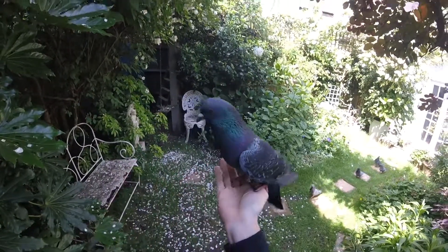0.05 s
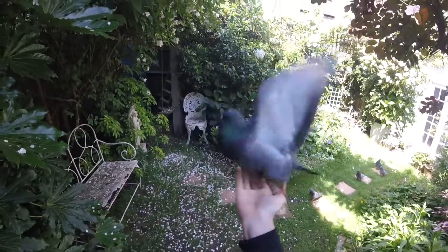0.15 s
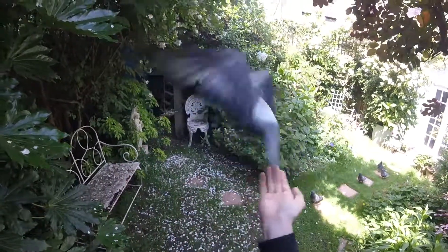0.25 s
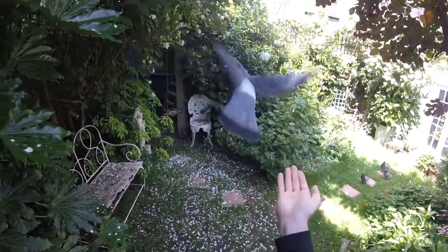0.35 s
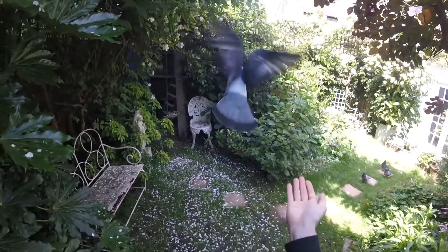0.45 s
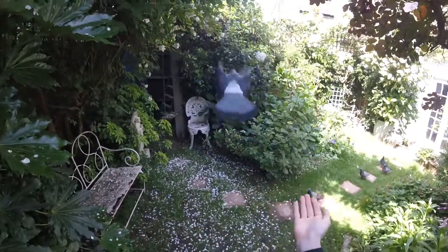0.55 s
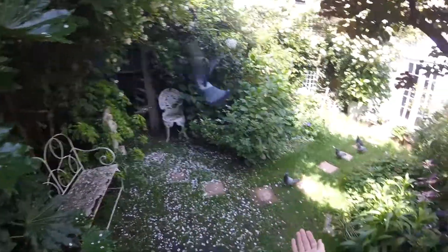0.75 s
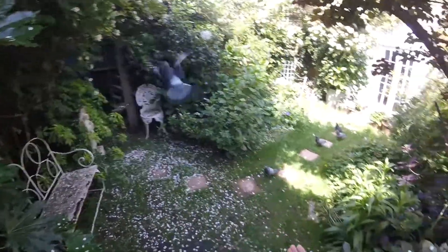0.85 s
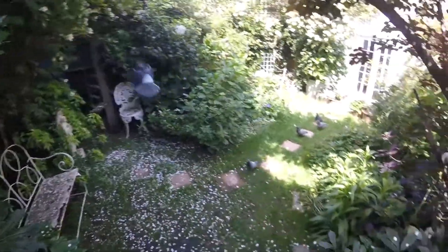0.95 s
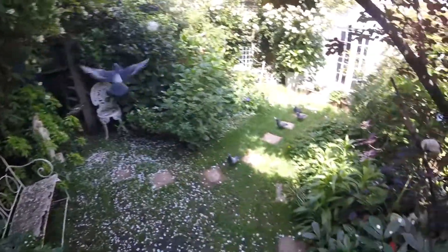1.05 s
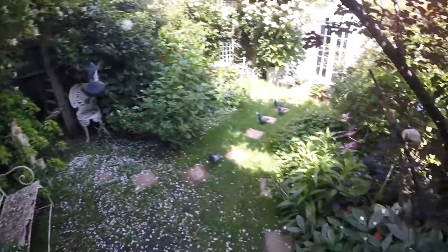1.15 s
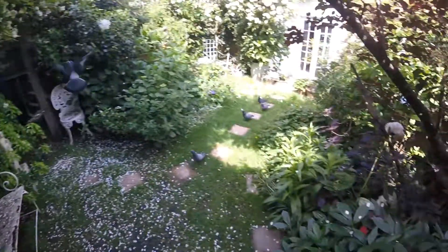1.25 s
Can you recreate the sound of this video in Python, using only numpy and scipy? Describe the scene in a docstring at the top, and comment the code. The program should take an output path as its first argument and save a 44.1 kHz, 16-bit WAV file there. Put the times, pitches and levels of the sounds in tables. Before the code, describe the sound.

Pigeon wings clatter softly into flight, swishing and whistling away across a quiet garden.

```python
"""Pigeon taking off from a hand.

The bird launches close to the microphone and flies off across a quiet garden. Each wingbeat
swishes and sets the flight feathers fluttering in a brief whistle; the nearest also push a slow
pressure wave. The wake buffets the microphone, whose gain ticks down in steps and creeps back."""
import sys
import numpy as np
from scipy import signal
from scipy.fft import rfft, irfft
from scipy.io import wavfile
from scipy.ndimage import uniform_filter1d

SR = 44100
rng = np.random.default_rng(int(sys.argv[2]) if len(sys.argv) > 2 else 0)


def waveform_to_disk(signal):
    """Save audio, clipped to [-1, 1], as 16-bit WAV at the path in sys.argv[1]."""
    frames = np.transpose(np.atleast_2d(signal))
    scaled = np.clip(frames, -1, 1) * 32767
    samples = np.round(scaled).astype(np.int16)
    wavfile.write(sys.argv[1], SR, samples)


N = 57330

# garden air: freq_hz, density_db
AIR_SPECTRUM = [(15, -3.5), (40, 4), (90, -7), (170, -10.5), (300, -12.5), (500, -22), (850, -26.5),
                (1400, -29.5), (3000, -36), (5700, -37), (6550, -28), (7200, -36.5), (9000, -39.5),
                (11000, -48.5), (13500, -48)]
# plumage on the hand: freq_hz, density_db
RUSTLE_SPECTRUM = [(150, -14), (500, -1.5), (1500, -2.5), (3000, -6.5), (6000, -19.5), (12000, -33)]
# hollow tones of the first stroke: centre_hz, width_oct, level_db
LAUNCH_TONES = [(818, 0.071, -42.5), (1930, .1, -48)]
# feather scuffs, thin squeaks and small sharp ticks: centre_s, half_s, level_db, centre_hz, width_oct
SCUFFS_AND_TICKS = [(0.1885, 0.0033, -50.5, 6200, 0.068), (0.201, 0.026, -57, 5030, 0.49),
                    (0.254, 0.0065, -51, 3740, 1.1), (0.285, 0.011, -57.5, 3800, .8),
                    (0.314, 0.0009, -45, 2800, .3), (0.3265, 0.0013, -47.5, 3800, .3),
                    (0.383, 0.03, -57, 2460, 0.77), (.445, 0.017, -60.5, 2480, 0.74),
                    (0.86, 0.01, -56, 6370, 0.021), (1.262, 0.006, -56, 6100, .025)]
# wingbeats: centre_s, half_s, swish_db, swish_tilt_db_oct, pitch_hz, whistle_db, whistle_tilt_db_oct
WINGBEATS = [(0.225, 0.013, -46, 2.5, 797.5, -58, 4), (0.418, 0.011, -48, -2, 721, -47.5, -2),
             (.578, 0.022, -58, 1, 668, -54.5, 4), (.715, .020, -54.5, 2, 756, -53.5, 3),
             (0.861, 0.018, -55.5, -0.5, 715, -57, 7.5), (0.993, 0.018, -51, 0.5, 924, -54, -29),
             (1.122, 0.019, -56, 2.5, 830, -57.5, -1.5), (1.258, .016, -55, 0, 868, -53.5, -5)]
# air through feathers: freq_hz, density_db
SWISH_SPECTRUM = [(200, -35.5), (500, 15), (900, 4.5), (2000, 4), (3800, 0), (5200, -1), (6500, -1),
                  (7500, -7), (11000, -23), (12300, -48)]
# feather flutter: harmonic, level_db
FLUTTER_HARMONICS = [(1, 11), (2, 6), (3, 0.5), (4, 0), (5, -7.5), (6, -9.5), (7, -7), (8, -9), (9, -11)]
# pressure waves of the nearest strokes: centre_s, half_s, suction_db
PRESSURE_WAVES = [(0.2375, 0.0078, -10.5), (0.401, .006, -17), (0.521, 0.0061, -27), (0.664, 0.0066, -32)]
# wake eddies: hit_s, turbulence_db, decay_s, tilt_db_oct, kick_db, ring_db
EDDIES = [(0.2738, -16.5, 0.0056, -4, -14.5, -46), (.305, -10, 0.012, 1.5, -1, -15.5),
          (.323, -6, .009, -2, -4, -25), (.341, -8.5, 0.0074, -1, -3, -27),
          (.363, -26, 0.015, -3, -23, -57), (.380, -23.5, 0.021, -1, -16.5, -44),
          (0.443, -37, 0.065, -13, -28.5, -76)]
# eddy turbulence: freq_hz, density_db
EDDY_SPECTRUM = [(15, -6.5), (35, 0), (65, -6), (105, -1.5), (190, -11), (310, -14.5), (410, -25),
                 (520, -19), (720, -23.5), (950, -38.5), (1400, -50), (3000, -64), (8000, -90)]
# microphone housing modes: freq_hz, level_db, decay_s
HOUSING_MODES = [(529, 0, 0.0063), (680.7, 0, 0.0075), (798, -7.5, .007), (1127, -14.5, 0.0045)]


def undb(db):
    """Decibels to gain."""
    return 10 ** (np.asarray(db) / 20)


def unit_rms(x):
    """Scale to rms 1."""
    return x / np.sqrt(np.mean(x ** 2) + 1e-20)


def since(at_s):
    """Seconds since at_s."""
    return np.arange(N) / SR - at_s


def bell(at_s, half_s):
    """Gaussian envelope, peak 1."""
    return np.exp(-.5 * (since(at_s) / half_s) ** 2)


def octaves(hz):
    """Octaves from hz to each spectral bin."""
    return np.log2(np.maximum(np.arange(N // 2 + 1) * SR / N, 1) / hz)


def noise(bin_db):
    """Noise of rms 1, shaped per bin."""
    return unit_rms(irfft(rfft(rng.standard_normal(N)) * undb(bin_db), N))


def colour(spectrum):
    """Interpolate a spectrum table to dB per bin."""
    hz, db = np.array(spectrum, float).T
    return np.interp(octaves(1), np.log2(hz), db)


def band(hz, width_oct):
    """Noise in one steep-skirted resonance."""
    return noise(-30 * np.log10(1 + (octaves(hz) / width_oct) ** 2 / 2))


def wander(rate_hz):
    """Smooth random signal of rms 1."""
    return noise(-40 * np.log10(1 + 4 ** octaves(rate_hz)))


def garden():
    """Steady outdoor rumble and thin hiss."""
    return undb(-45.5) * noise(colour(AIR_SPECTRUM))


def take_off(rustle_end_s=.284, fade_s=.039):
    """Plumage rustles on the hand; the first, hardest stroke rings hollow."""
    fade = np.clip(-since(rustle_end_s) / fade_s, 0, 1)
    rustle = undb(-58.5) * noise(colour(RUSTLE_SPECTRUM)) * fade
    hollow = sum(undb(db) * band(hz, width_oct) for hz, width_oct, db in LAUNCH_TONES)
    return rustle + bell(at_s=.2303, half_s=.0067) * hollow


def garden_echo(x, delay_s=.024, t60_s=1, cutoff_hz=3840):
    """Bushes and walls scatter back a faint, dull tail."""
    t = since(delay_s)
    dull = noise(-10 * np.log10(1 + 4 ** octaves(cutoff_hz)))
    tail = dull * (t > 0) * undb(-60 * np.abs(t) / t60_s)
    return undb(-13) * signal.fftconvolve(x, tail / np.sqrt(np.sum(tail ** 2)))[:N]


def scuffs_and_ticks():
    """Feather scuffs, thin squeaks and small sharp ticks: brief bands of noise."""
    return sum(undb(db) * bell(at_s, half_s) * band(hz, width_oct)
               for at_s, half_s, db, hz, width_oct in SCUFFS_AND_TICKS)


def airspeed(at_s, half_s):
    """Bell-like airflow over the feathers in one stroke, peak 1."""
    return np.exp(-.5 * np.abs(since(at_s) / half_s) ** 1.83)


def wing_swishes(grain_db=1.07):
    """Air rushes through the feathers at each stroke, slightly grainy."""
    out = 0
    for at_s, half_s, db, tilt_db_oct, *_ in WINGBEATS:
        envelope = undb(db + grain_db * wander(330)) * airspeed(at_s, half_s)
        out += envelope * noise(colour(SWISH_SPECTRUM) + tilt_db_oct * octaves(3000))
    return out


def feather_flutter(at_s, half_s, hz, tilt_db_oct, rise_per_s=2.7, bend_s=.115, flicker_db=1.8):
    """One wing's feathers flutter: a harmonic tone that climbs with the stroke and levels off."""
    t = np.clip(since(at_s), -2 * half_s, 2 * half_s)
    jitter = .006 * wander(400)
    pitch_hz = hz * np.exp(rise_per_s * t - (t / bend_s) ** 2 + jitter)
    phase = 2 * np.pi * (np.cumsum(pitch_hz) / SR + rng.random())
    tone = sum(undb(db + tilt_db_oct * np.log2(k)) * np.sin(k * phase + 2 * np.pi * rng.random())
               for k, db in FLUTTER_HARMONICS)
    return unit_rms(tone * undb(flicker_db * wander(130)))


def wing_whistles(detune=.04, far_gain=.2):
    """Both wings whistle at each stroke, the far one lower and fainter."""
    out = 0
    for at_s, half_s, _, _, hz, db, tilt_db_oct in WINGBEATS:
        near = feather_flutter(at_s, half_s, hz, tilt_db_oct)
        far = feather_flutter(at_s, half_s, hz * (1 - detune), tilt_db_oct)
        out += undb(db) * (near + far_gain * far) * airspeed(at_s, half_s)
    return out


def pressure_waves():
    """A near wing sweeps past: pressure, suction, pressure."""
    return sum(undb(db) * ((since(at_s) / half_s) ** 2 - 1) * bell(at_s, half_s)
               for at_s, half_s, db in PRESSURE_WAVES)


def housing_ring(at_s, rise_s=.0011):
    """The microphone housing rings, short and hollow, under an eddy."""
    t = np.maximum(since(at_s), 0)
    modes = sum(undb(db) * np.exp(-t / decay_s) * np.sin(2 * np.pi * hz * t)
                for hz, db, decay_s in HOUSING_MODES)
    return (1 - np.exp(-(t / rise_s) ** 2)) * modes


def wake(rise_s=.0016, kick_half_s=.0022):
    """Each eddy hits the microphone: push-pull pressure kick, dull turbulence, housing ring."""
    out = 0
    for at_s, db, decay_s, tilt_db_oct, kick_db, ring_db in EDDIES:
        t = since(at_s)
        envelope = np.where(t < 0, bell(at_s, rise_s), np.exp(-np.abs(t) / decay_s))
        burst = noise(colour(EDDY_SPECTRUM) + tilt_db_oct * np.maximum(octaves(55), 0)) * envelope
        burst *= np.sqrt(np.sum(envelope ** 2) / np.sum(burst ** 2))
        kick_s = at_s + kick_half_s
        kick = -since(kick_s) / kick_half_s * bell(kick_s, kick_half_s)
        out += undb(db) * burst + undb(kick_db) * kick + undb(ring_db) * housing_ring(at_s)
    return out


def gain_control(x, block_s=.032, limit_db=-21.5, range_db=9.5, max_step_db=5.5, recover_db_s=3.5):
    """Loud blocks step the gain down with a tick, to at most range_db; in quiet it creeps back."""
    gain_db, ticks = np.zeros(N), np.zeros(N)
    cut_db = target_db = 0
    first_block_s, tick_decay_s = .0051, .019
    edges = (np.arange(first_block_s, N / SR, block_s) * SR).astype(int)
    for start, end in zip(edges[:-1], edges[1:]):
        loud = np.std(x[start:end]) > undb(limit_db)
        target_db = range_db if loud else max(target_db - recover_db_s * block_s, 0)
        step_db = min(target_db - cut_db, max_step_db)
        cut_db += step_db
        gain_db[end:] = -cut_db
        ticks[end:] += max(step_db, 0) / max_step_db * np.exp(-np.arange(N - end) / SR / tick_decay_s)
    ticks = signal.sosfilt(signal.butter(10, 10200, fs=SR, output="sos"), ticks)
    return x * undb(uniform_filter1d(gain_db, size=64)) - undb(-25.5) * ticks


def scene():
    """Bird, wake and garden at one microphone."""
    rush = wing_swishes() + take_off()
    bird = rush + garden_echo(rush) + wing_whistles() + pressure_waves()
    return (bird + scuffs_and_ticks() + wake() + garden())[None, :]


def record(dry, low_hz=4, top_hz=13500):
    """Rumble filter, stepped gain control, steep low-pass."""
    highpass = signal.butter(1, low_hz, "high", fs=SR, output="sos")
    lowpass = signal.ellip(8, .2, 70, top_hz, fs=SR, output="sos")
    levelled = gain_control(signal.sosfilt(highpass, dry[0]))
    return signal.sosfilt(lowpass, levelled)[None, :]


dry = scene()
out = record(dry)
waveform_to_disk(out)
```